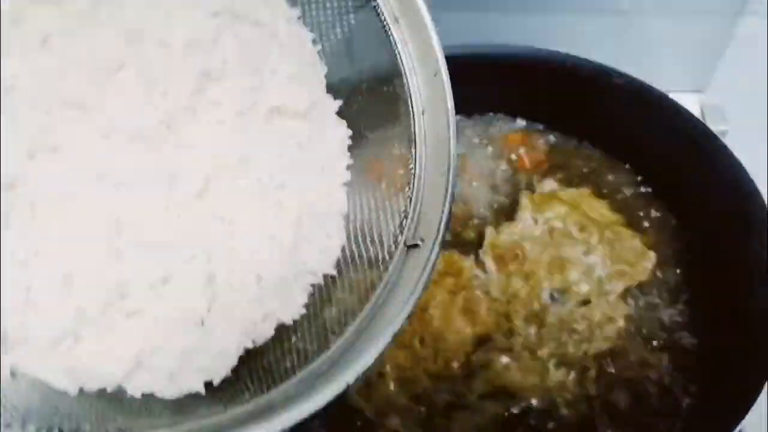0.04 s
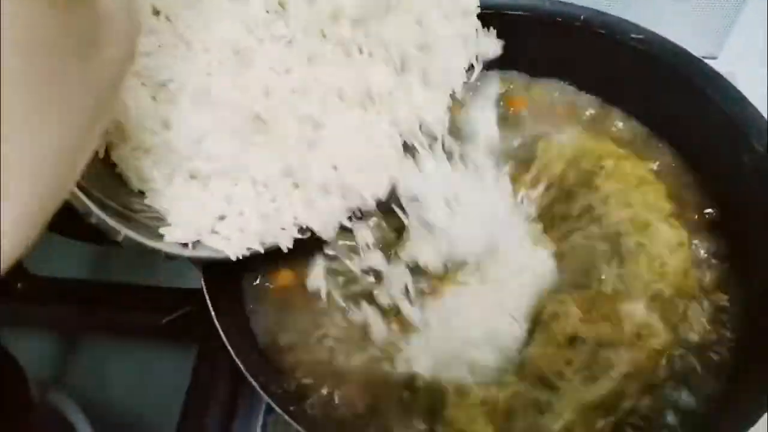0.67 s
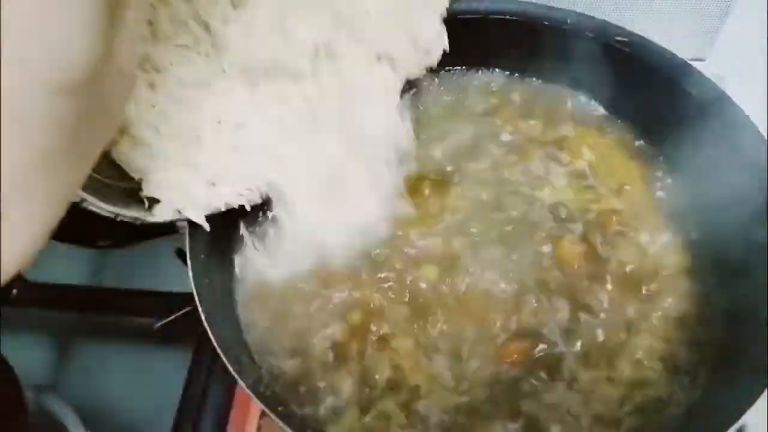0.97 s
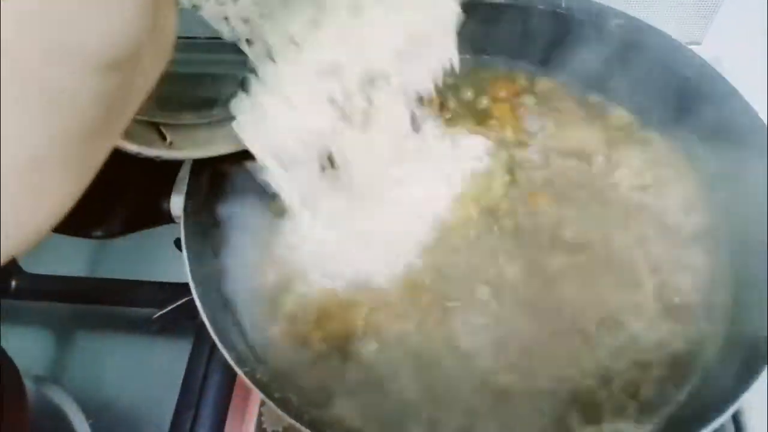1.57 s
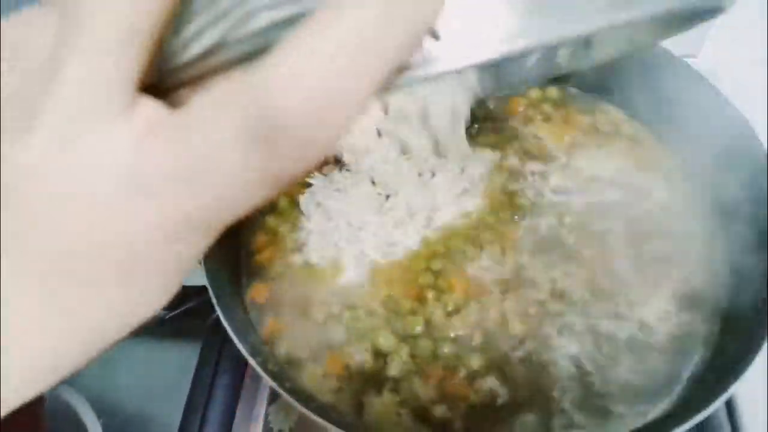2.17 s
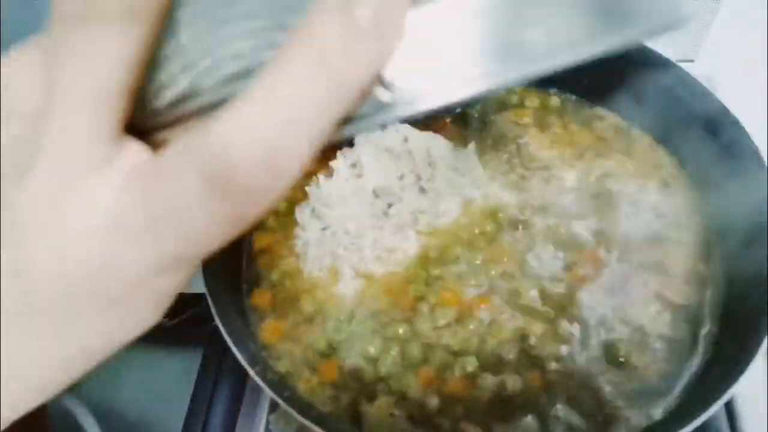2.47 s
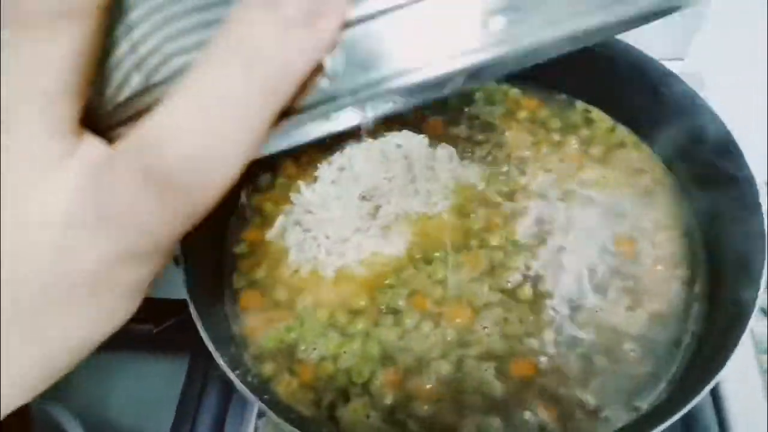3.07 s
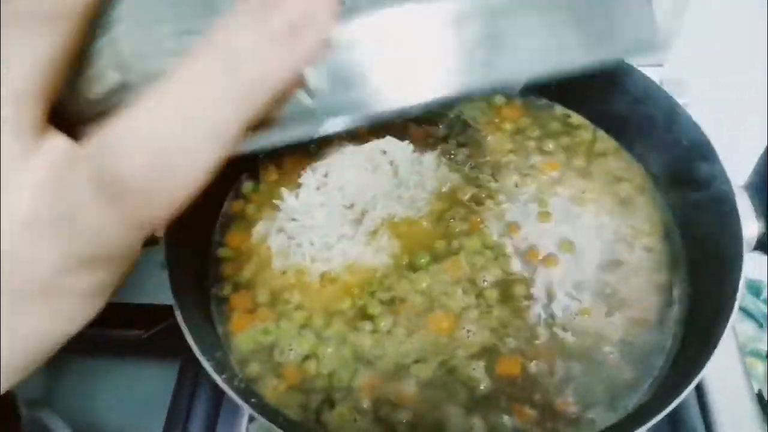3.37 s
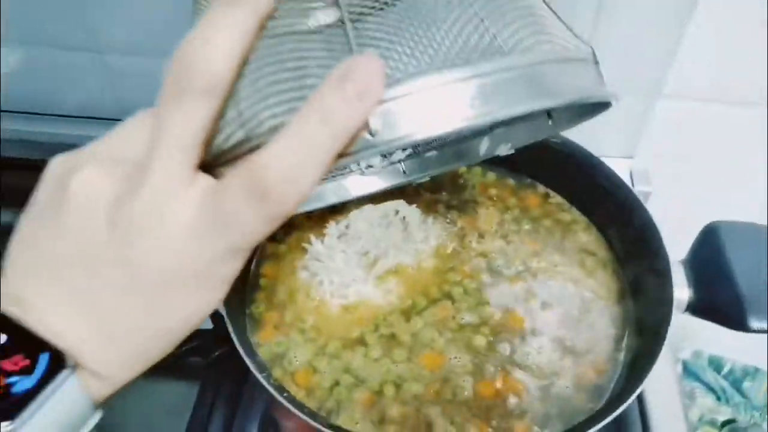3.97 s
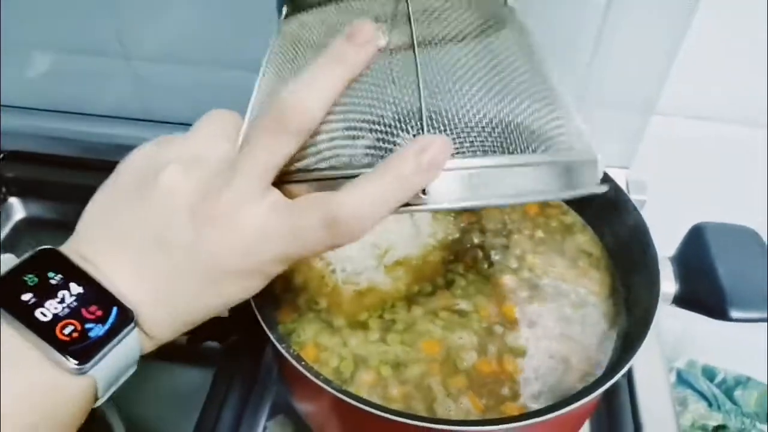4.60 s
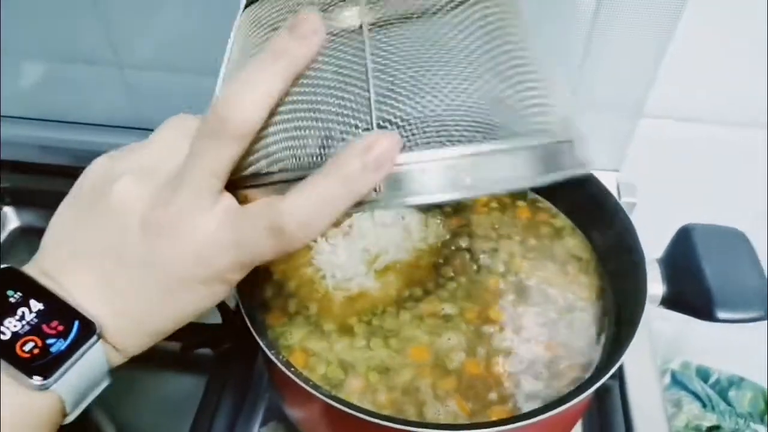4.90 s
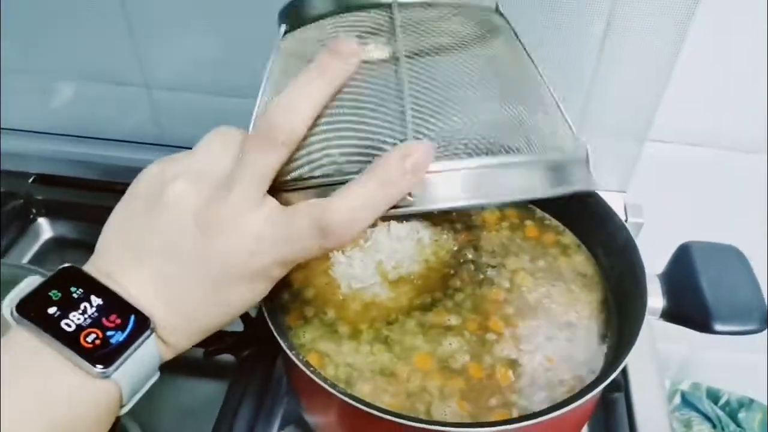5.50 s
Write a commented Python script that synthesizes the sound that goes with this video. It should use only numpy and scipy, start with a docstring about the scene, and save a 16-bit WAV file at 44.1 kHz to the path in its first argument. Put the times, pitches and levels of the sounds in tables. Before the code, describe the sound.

Wet rice slides into simmering broth, then a metal strainer is knocked on the pot rim in two runs of ringing clanks.

```python
"""A pot of vegetables simmers on a gas hob in a small tiled kitchen; burner and fizz fade over two seconds.
From 0.3 to 2.4 s wet rice slides from a steel mesh strainer into the broth. From 2.5 s the upturned
strainer is knocked on the rim six times, held flat; from 4.3 s six more times, tilted. Each knock clicks,
rings the strainer, rocks the heavy pot on the grate and sets the sheet-metal hob shuddering."""
import sys
import numpy as np
from scipy import signal
from scipy.fft import rfft, irfft, next_fast_len
from scipy.io import wavfile
from scipy.ndimage import map_coordinates

SR = 44100
rng = np.random.default_rng(int(sys.argv[2]) if len(sys.argv) > 2 else 0)


def dump(signal):
    """Clip the signal to [-1, 1] and save it as 16-bit WAV at the path in sys.argv[1]."""
    limited = np.clip(np.atleast_2d(signal).T, -1, 1)
    pcm = np.round(limited * 32767).astype(np.int16)
    wavfile.write(sys.argv[1], SR, pcm)


N = 244710
EVENT_TIME_S = np.arange(int(0.7 * SR)) / SR
SIDES = np.array([[1], [-1]])  # left, right

# strainer on rim: start_s, click_db, clack_db, shudder_db, rebound_db, drop_wait_s, drop_db
KNOCKS = [(2.49, -37.5, -36, -38, -58, 0.043, -49), (2.708, -52, -31, -30, -40.5, 0.05, -38.5),
          (2.914, -40, -27, -30.5, -29, 0.1, -42.5), (3.107, -37.5, -27.5, -31, -32.5, 0.1, -38.5),
          (3.3, -37, -31.5, -31, -40, 0.097, -38.5), (3.488, -37.5, -43.5, -39, -40.5, 0.082, -47),
          (4.3225, -33.5, -36.5, -34, -36, 0.071, -35.5), (4.5636, -50, -38, -36, -47, 0.035, -49.5),
          (4.7427, -32.5, -38, -34, -34.5, .047, -34), (4.943, -34, -36, -33, -33.5, 0.048, -33),
          (5.158, -35.5, -37, -32.5, -35, 0.087, -46), (5.391, -32.5, -37.5, -35, -37, 0.075, -34)]
# strainer grip: clank_db, ting_db, thump_db
FLAT, TILTED = (-4.5, -9, 6.5), (1.65, -6, -2.5)
# rice stream: time_s, flow_db, spray_db
POUR = [(0.3, -58, -65), (0.42, -53.5, -54), (0.48, -56, -68), (0.505, -43, -57), (0.525, -34, -48),
        (0.62, -37.5, -48), (0.69, -34.5, -51), (0.73, -44.5, -54), (0.86, -42, -49), (1.0, -42.5, -47),
        (1.025, -36, -39), (1.05, -55, -61), (1.17, -44, -49), (1.28, -42.5, -52.5), (1.5, -48.5, -58.5),
        (1.7, -54, -65), (1.85, -64.5, -72), (2.03, -63, -68), (2.15, -47.5, -69), (2.38, -73, -74)]
# rice clumps landing, then the strainer ticking on the rim: start_s, level_db, centre_hz
TICKS = [(0.405, -23, 7350), (0.4257, -27.5, 7500), (0.5233, -26, 5500), (0.6116, -16, 3820),
         (0.7669, -18.5, 3700), (0.789, -17.5, 5960), (1.167, -21, 4560), (1.31, -17.5, 5900),
         (2.6174, -27, 7940), (2.645, -29, 6200), (2.6722, -29.5, 6340), (2.8328, -26, 6160)]
# plops and pops in the broth, one low thump of a rice lump: start_s, level_db, pitch_hz, t60_s
PLOPS = [(0.554, -31.5, 268, 0.11), (0.676, -26.5, 234, 0.068), (0.6952, -11.5, 12800, 0.0034),
         (0.821, -40, 280, 0.06), (1.015, -22, 1185, 0.0075), (1.176, -35, 3220, 0.034),
         (1.814, -47, 2900, 0.027), (2.083, -40.5, 3340, 0.035)]
# broth heaving: crest_s, length_s, level_db
HEAVES = [(0.088, 0.12, -46), (0.383, 0.062, -34), (0.705, 0.19, -36.5), (1.22, 0.15, -39.5),
          (1.63, 0.39, -40.5), (1.865, 0.33, -37.5)]

# modes of strainer, pot and hob: pitch_hz, level_db, t60_s
STRAINER_MODES = [(2210, -7, .2), (3210, -6, 0.28), (3400, -7, 0.28), (3747, -17, 0.17), (3970, 1, 0.25),
                  (4130, -11, .22), (4443, -12, .2), (6200, 0, .12), (6360, 12, 0.065), (6900, -6, 0.18),
                  (8419, -12, 0.17), (8903, -2, .15), (9445, -13, 0.12), (13640, -3, .08)]
POT_WALL_MODES = [(436, -1, 0.097), (584, -12.5, 0.14), (882, 11.5, 0.062), (1424, 14, 0.014)]
POT_CLANK_MODES = [(1860, -16, .045), (2210, 0, .055), (2300, -7, .045)]
GRATE_RATTLE_MODES = [(2860, -13, 0.017), (3555, -5, 0.053), (3800, 10, 0.014), (3973, 4, 0.041),
                      (4220, -2.5, 0.054), (4530, 1.5, 0.022)]
GRATE_TING_MODES = [(6140, 3, 0.076), (6500, -14, 0.032), (6820, 16, 0.049), (7100, 3, .06), (7460, 6, .06),
                    (8940, -22, 0.055)]
HOB_TOP_MODES = [(147, -1, 0.13), (239.8, 7, 0.074), (300, -11, 0.086), (403, -14, 0.062),
                 (558, -16, 0.062), (718, -8, 0.082)]

# noise spectra of knocks, rice and simmer: freq_hz, density_db
CLICK_SPECTRUM = [(1500, -75), (3000, -6), (4800, -5.5), (5600, -6), (6600, 3.5), (7400, -3.5), (9300, -5),
                  (10300, -21.5), (12200, -18), (13500, -11.5), (16000, -23)]
CLACK_SPECTRUM = [(500, -8.5), (880, 2), (1200, -3), (2200, -2.5), (2750, 4), (3300, -4), (3900, -3),
                  (5200, 1), (6500, -7), (10000, -45)]
THUD_SPECTRUM = [(60, -29), (130, 10.5), (420, 8.5), (620, 3), (880, -3), (1500, -15.5), (2500, -19.5)]
MESH_SPECTRUM = [(600, -34), (1300, -37), (2600, 5), (4000, 12.5), (5500, 1.5), (7500, 6.5), (9300, 10.5),
                 (10300, -3), (12200, 1), (13500, 4), (16000, 2)]
SHUDDER_SPECTRUM = [(40, -30), (75, -12.5), (100, 0.5), (190, -6.5), (245, 7.5), (300, -2.5), (400, -11),
                    (560, -8.5), (660, -16), (860, -16.5), (1300, -28), (2000, -24.5), (3000, -71)]
PATTER_SPECTRUM = [(800, -64), (1500, -18), (2200, -1.5), (2900, -2), (4500, 1), (5600, -3.5), (6700, 3),
                   (9200, -6.5), (10200, -38), (12500, -23.5), (16000, -41.5)]
SPRAY_SPECTRUM = [(5000, -11.5), (9000, 4.5), (10300, -8), (12200, -2), (13300, 7.5), (16000, 1.5)]
SPLASH_SPECTRUM = [(200, 13.5), (300, -12), (600, 6.5), (900, 13), (1600, 4), (3000, -39)]
BOIL_SPECTRUM = [(11, -29), (18, 4.5), (54, -6.5), (75, -12), (108, -5), (122, -11.5), (141, -15),
                 (171, -17.5), (212, -29.5), (248, -13.5), (279, -59), (354, -31), (420, -36.5),
                 (550, -35.5), (920, -120)]
BURNER_SPECTRUM = [(130, -53), (220, -8), (248, 5.5), (306, -8), (352, -6.5), (389, -10), (541, -17.5),
                   (791, -4.5), (1100, -12), (1410, -10), (1600, -13), (1850, -20.5), (2400, -31.5),
                   (3120, -55), (5280, -120)]
FIZZ_SPECTRUM = [(1000, -10), (1900, -1), (3000, 4), (5000, -0.5), (6800, -0.5), (9300, -7.5),
                 (10200, -18.5), (12500, -6), (13300, -5), (16000, -0.5)]

# kitchen reverberation: freq_hz, t60_s
KITCHEN_DECAY = [(150, 1), (700, 0.41), (2200, 0.64), (4500, 0.52), (8000, 0.39), (14000, 0.26)]
# left-right likeness of the sound field: freq_hz, correlation
COHERENCE = [(60, 0.99), (300, 0.92), (640, 0.76), (1400, 0.26), (3000, 0.032), (7000, 0.69), (15000, 0.26)]
# microphone colour: freq_hz, left_minus_right_db
MIC_BALANCE = [(60, 1.7), (250, 1), (1000, 1), (2400, 0.5), (4500, -1.5), (8000, 0.5), (14000, 3)]


def strainer_knocks():
    """Steel meets the rim: a click, the pot sounds, the hoop rings and the mesh buzzes."""
    strike, hoop = np.zeros((2, N)), np.zeros((2, N))
    snap = fade(t60_s=0.009, attack_s=0.0003) + 0.17 * fade(t60_s=0.045, attack_s=0.002)
    for start_s, click_db, clack_db, _, rebound_db, *_ in KNOCKS:
        click = amp(click_db + 12.5) * snap * noise(CLICK_SPECTRUM)
        clack = amp(clack_db + 7) * snap * noise(CLACK_SPECTRUM)
        thud = amp(clack_db) * fade(t60_s=0.035, attack_s=0.0034) * noise(THUD_SPECTRUM)
        wall = amp(clack_db - 1.7) * ring(POT_WALL_MODES, attack_s=0.00081, skew_rad=0.43, detune=0.0061)
        add(strike, start_s, click + clack + thud + wall)
        buzz = amp(rebound_db - 4.5) * fade(t60_s=0.091, attack_s=0.013) * noise(MESH_SPECTRUM)
        ring_db = (click_db + clack_db) / 2 - 5
        ringing = amp(ring_db) * ring(STRAINER_MODES, attack_s=0.0014, skew_rad=0.7, detune=0.004)
        # the loose mesh keeps feeding the hoop's highest modes
        shimmer = ring(STRAINER_MODES[-7:], attack_s=0.012, skew_rad=1.1, detune=0.007)
        add(hoop, start_s, buzz + ringing + amp(rebound_db - 9) * shimmer)
    return kitchen(strike, wet_db=-9.5) + kitchen(hoop, wet_db=-2.5)


def pot_rocking():
    """After each knock the pot chatters on the iron grate, tips and drops back."""
    wall, chatter = np.zeros((2, N)), np.zeros((2, N))
    for start_s, *_, rebound_db, drop_wait_s, drop_db in KNOCKS:
        clank_db, ting_db, _ = grip(start_s)
        for contact_s, level_db in bounces(start_s, rebound_db) + [(start_s + drop_wait_s, drop_db)]:
            clank = ring(POT_CLANK_MODES, attack_s=0.011, skew_rad=0.75, detune=0.0091)
            add(wall, contact_s, amp(level_db + clank_db + 11.5) * clank)
            rattle = amp(7.5) * ring(GRATE_RATTLE_MODES, attack_s=0.0014, skew_rad=0.78, detune=0.0088)
            clack = amp(-4) * fade(t60_s=0.041, attack_s=0.0012) * noise(CLACK_SPECTRUM)
            ting = amp(ting_db + 6) * ring(GRATE_TING_MODES, attack_s=0.001, skew_rad=0.98, detune=0.003)
            add(chatter, contact_s, amp(level_db) * (rattle + clack + ting))
    return kitchen(wall, wet_db=-10.5) + kitchen(chatter, wet_db=-5.5)


def bounces(start_s, level_db, flights_s=(0.021, 0.011, 0.0099), loss_db=5):
    """Contacts after a knock, each sooner and weaker: time_s, level_db."""
    return [(start_s + wait_s, level_db - loss_db * k) for k, wait_s in enumerate(np.cumsum(flights_s))]


def grip(time_s):
    """The strainer is flat in the first run, tilted in the second."""
    return FLAT if time_s < 4 else TILTED


def hob_shudder(landing_s=0.045):
    """Knocks pass through the grate; the sheet metal shudders and booms twice under the pot's weight."""
    shudder, booms = np.zeros((2, N)), np.zeros((2, N))
    swell = fade(t60_s=0.51, attack_s=0.033)
    for start_s, _, _, shudder_db, *_ in KNOCKS:
        add(shudder, start_s, amp(shudder_db + 0.5) * swell * noise(SHUDDER_SPECTRUM))
        *_, thump_db = grip(start_s)
        for wait_s in (landing_s, 1.85 * landing_s):
            boom = ring(HOB_TOP_MODES, attack_s=0.004, skew_rad=0.1, detune=0.022)
            add(booms, start_s + wait_s, amp(shudder_db + thump_db) * boom)
    return shudder + kitchen(booms, wet_db=-8)


def rice_pour(full_flow_db=-35):
    """Wet grains peel off the mesh and patter into the broth; a heavy flow splashes."""
    time_s = np.arange(N) / SR
    knots_s, *columns = np.transpose(POUR)
    flow_db, spray_db = [np.interp(time_s, knots_s, column) for column in columns]
    pouring = np.interp(time_s, [0.25, 0.4, 2.3, 2.45], [0, 1, 1, 0])
    lumps_db = 1.8 * wobble(rate_hz=110) + 1.5 * wobble(rate_hz=35)
    crackle = 0.6 * wet_crackle(rate_hz=450, centre_hz=5800, t60_cycles=11)
    coarse, fine = grains(rate_hz=3500, scatter_db=4), grains(rate_hz=3000, scatter_db=4)
    patter = amp(flow_db + lumps_db - 2) * (spread(coarse, PATTER_SPECTRUM) + crackle)
    spray = amp(spray_db + lumps_db + 4.5) * spread(fine, SPRAY_SPECTRUM)
    splash_db = -47 + 1.74 * (flow_db - full_flow_db)
    splash = amp(splash_db) * spread(grains(rate_hz=1100, scatter_db=1), SPLASH_SPECTRUM)
    return kitchen(pouring * (patter + spray + splash), wet_db=-7.5)


def wet_crackle(rate_hz, centre_hz, t60_cycles):
    """Wet grains part with tiny ringing clicks, each at its own pitch and place."""
    out, time_s = np.zeros((2, N)), EVENT_TIME_S[:SR // 80]
    count = int(rate_hz * N / SR)
    starts_s = rng.random(count) * N / SR
    scatter = np.clip(rng.standard_normal((count, 3)), -2, 2)
    for start_s, (pitch, size, pan) in zip(starts_s, scatter):
        pitch_hz = centre_hz * np.exp(0.38 * pitch)
        click = plop(time_s, pitch_hz, t60_s=t60_cycles / pitch_hz)
        add(out, start_s, amp(5 * size + 3 * pan * SIDES) * click)
    return unit_rms(out)


def ticks_and_plops():
    """Rice clumps tick, later the strainer on the rim; the broth plops and one rice lump thumps."""
    out = np.zeros((2, N))
    tick = fade(t60_s=0.053, attack_s=0.00061)
    for start_s, level_db, hz in TICKS:
        spectrum = [(hz / 4, -32), (hz / 2, -10), (hz, 0), (hz * 2, -15), (hz * 4, -30)]
        add(out, start_s, amp(level_db - 13.5) * tick * noise(spectrum))
    for start_s, level_db, pitch_hz, t60_s in PLOPS:
        add(out, start_s, amp(level_db) * plop(EVENT_TIME_S, pitch_hz, t60_s))
    return kitchen(out, wet_db=-7.5)


def plop(time_s, pitch_hz, t60_s):
    """A damped tone that rises a little in pitch."""
    envelope = amp(-60 * time_s / t60_s) * (1 - np.exp(-time_s * pitch_hz))
    return envelope * np.sin(2 * np.pi * pitch_hz * time_s * (1 + 0.056 * time_s / t60_s))


def simmer(fade_s=(0.2, 1.9)):
    """The burner's rush and the fizz fade; the broth heaves and its rumble slowly grows quieter."""
    time_s = np.arange(N) / SR
    boil = amp(-40 - 1.22 * time_s + 2.2 * wobble(rate_hz=9)) * noise(BOIL_SPECTRUM, N)
    swells = sum(amp(level_db) * np.cos(np.pi * np.clip((time_s - crest_s) / length_s, -0.5, 0.5)) ** 2
                 for crest_s, length_s, level_db in HEAVES)
    heave = swells * noise([(60, -38), (92, -2), (112, 18.5), (130, -3), (180, -43)], N)
    burner_db = np.interp(time_s, fade_s, [-51.5, -57.5]) + 1.84 * wobble(rate_hz=17)
    burner = amp(burner_db) * noise(BURNER_SPECTRUM, N)
    bubbles = grains(rate_hz=500, scatter_db=6) + 1.5 * rng.standard_normal((2, N))
    fizz_db = np.interp(time_s, fade_s, [-56.5, -70])
    return boil + heave + burner + amp(fizz_db) * spread(bubbles, FIZZ_SPECTRUM)


def kitchen(direct, wet_db, buildup_s=0.0072):
    """Direct sound plus echoes off the tiles, with a fresh tail for each block."""
    out, block = direct.copy(), SR // 3
    for i in range(0, N, block):
        white = noise([(100, 0), (16000, 0)], SR // 2)
        freq_hz, time_s, bins = signal.stft(white, SR, nperseg=256)
        decay = amp(-60 * time_s / along(KITCHEN_DECAY, freq_hz)[:, None])
        _, tail = signal.istft(bins * decay, SR, nperseg=256)
        tail *= 1 - np.exp(-EVENT_TIME_S[:tail.shape[1]] / buildup_s)
        echoes = signal.fftconvolve(direct[:, i:i + block], tail / np.linalg.norm(tail[0]), axes=1)
        add(out, i / SR, amp(wet_db) * echoes)
    return out


def ring(modes, attack_s, skew_rad, detune):
    """Damped modes; strength, pitch and left-right phase vary with each contact."""
    out, power = np.zeros((2, len(EVENT_TIME_S))), 0
    for pitch_hz, level_db, t60_s in modes:
        size, shift, skew, phase = rng.standard_normal(4)
        gain = amp(level_db + 3 * size)
        phase_rad = 2 * np.pi * phase + skew_rad * skew * SIDES
        time_s = EVENT_TIME_S[EVENT_TIME_S < 1.3 * t60_s]
        tone = np.sin(2 * np.pi * pitch_hz * (1 + detune * shift) * time_s + phase_rad)
        out[:, :len(time_s)] += gain * amp(-60 * time_s / t60_s) * tone
        power += gain ** 2 / 2
    return out * (1 - np.exp(-EVENT_TIME_S / attack_s)) / np.sqrt(power)


def fade(t60_s, attack_s):
    """Swell and decay, peak 1."""
    shape = (1 - np.exp(-(EVENT_TIME_S / attack_s) ** 2)) * amp(-60 * EVENT_TIME_S / t60_s)
    return shape / shape.max()


def grains(rate_hz, scatter_db):
    """Two independent showers of tiny, uneven impacts."""
    hits = rng.random((2, N)) < rate_hz / SR
    size_db = scatter_db * np.clip(rng.standard_normal((2, N)), -2, 2)
    return unit_rms(hits * rng.choice([-1, 1], (2, N)) * amp(size_db))


def noise(spectrum, samples=len(EVENT_TIME_S)):
    """Coloured stereo noise."""
    return spread(rng.standard_normal((2, samples)), spectrum)


def spread(pair, spectrum):
    """Two independent signals to a coloured stereo field, rms 1, alike in the bass."""
    def response(hz):
        angle_rad = np.arccos(np.clip(along(COHERENCE, hz), -1, 1)) / 2
        return amp(along(spectrum, hz)) * [np.cos(angle_rad), np.sin(angle_rad)]
    mid, side = filtered(pair, response)
    return unit_rms(np.array([mid + side, mid - side]))


def wobble(rate_hz):
    """Smooth curve through random knots."""
    knots = rng.standard_normal(int(N * rate_hz / SR) + 4)
    return map_coordinates(knots, [np.arange(N) * rate_hz / SR])


def filtered(sound, response):
    """Apply a frequency response by FFT."""
    samples = sound.shape[-1]
    padded = next_fast_len(samples + SR // 8)
    return irfft(rfft(sound, padded) * response(np.fft.rfftfreq(padded, 1 / SR)), padded)[..., :samples]


def along(points, hz):
    """Interpolate on a log frequency axis."""
    knots_hz, values = np.transpose(points)
    return np.interp(np.log(hz + 1), np.log(knots_hz + 1), values)


def add(track, start_s, sound):
    part = track[:, round(start_s * SR):][:, :sound.shape[-1]]
    part += sound[..., :part.shape[-1]]


def amp(level_db):
    return 10 ** (np.asarray(level_db) / 20)


def unit_rms(sound):
    return sound / np.sqrt(np.mean(sound ** 2) + 1e-20)


def scene():
    """Knocks, slightly louder and earlier on the left, over rice and simmer."""
    pan_db, lead_s = 0.61 * SIDES, 1.2e-5 * SIDES
    knocks = strainer_knocks() + pot_rocking() + hob_shudder()
    knocks = filtered(knocks, lambda hz: amp(pan_db) * np.exp(2j * np.pi * hz * lead_s))
    return knocks + rice_pour() + ticks_and_plops() + simmer()


def record(dry):
    """Two microphones of unequal colour; deep rumble and top treble are cut."""
    low_cut_hz, high_cut_hz = 38, 15950
    heard = filtered(dry, lambda hz: amp(along(MIC_BALANCE, hz) / 2 * SIDES))
    heard = filtered(heard, lambda hz: hz ** 2 / np.sqrt(hz ** 4 + low_cut_hz ** 4))
    return filtered(heard, lambda hz: 1 / np.sqrt(1 + (hz / high_cut_hz) ** 200))


dry = scene()
out = record(dry)
dump(out)
```